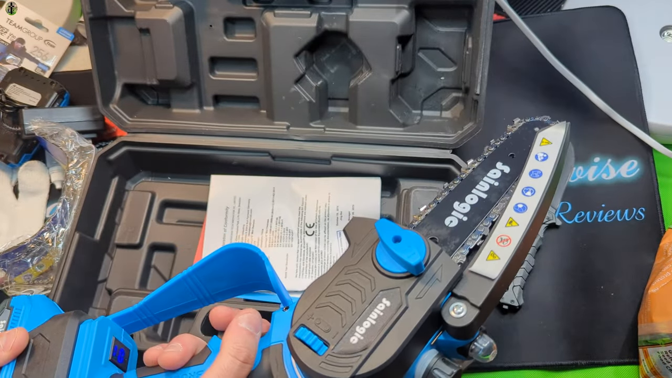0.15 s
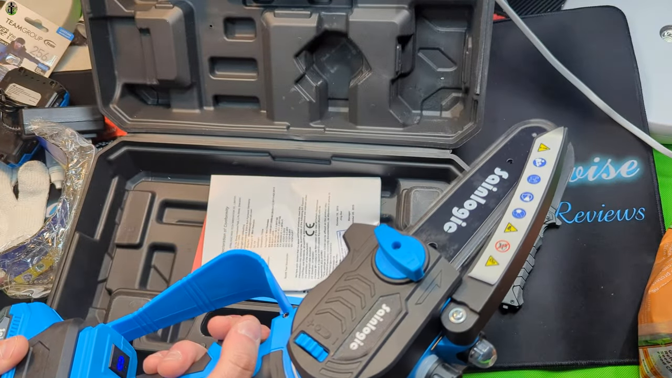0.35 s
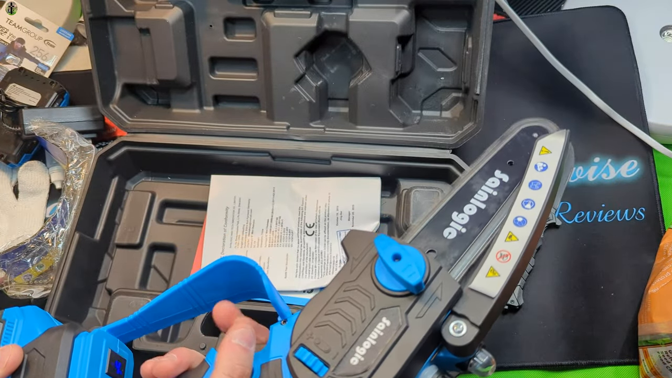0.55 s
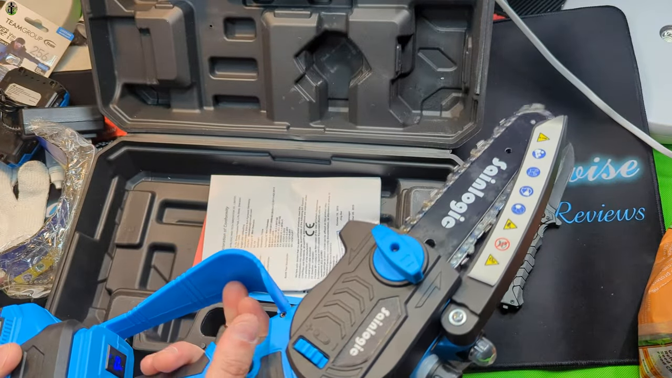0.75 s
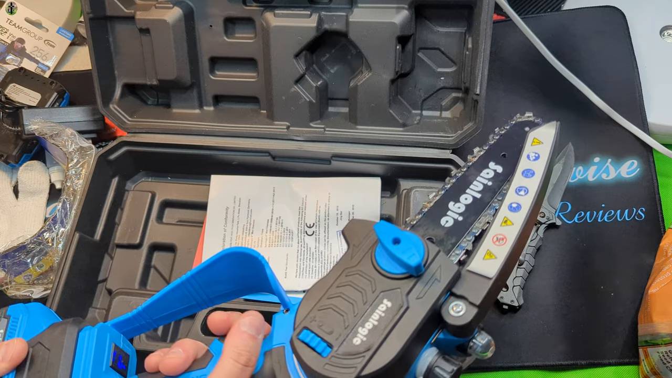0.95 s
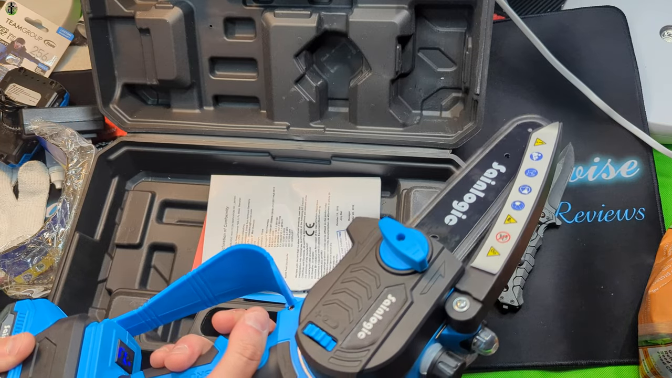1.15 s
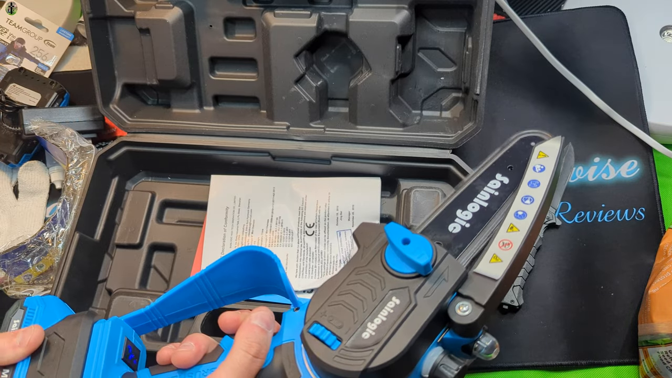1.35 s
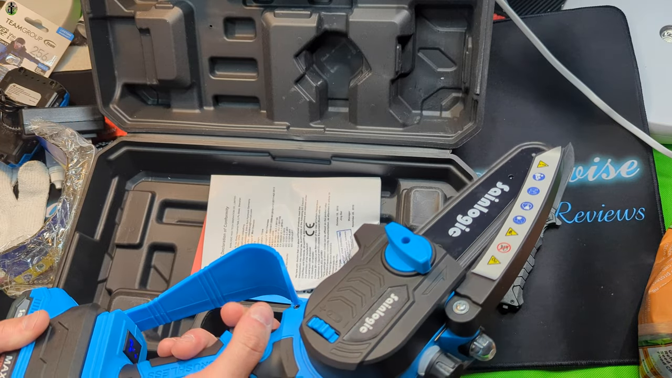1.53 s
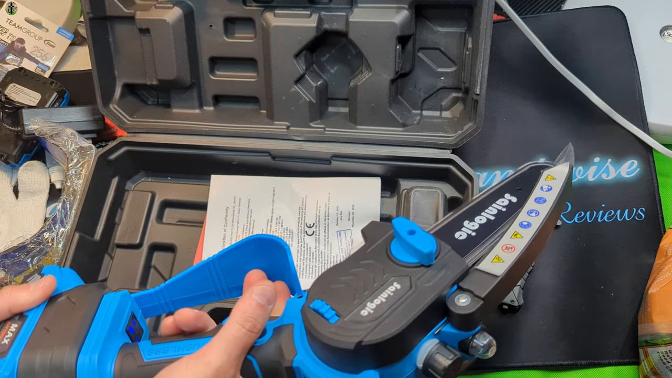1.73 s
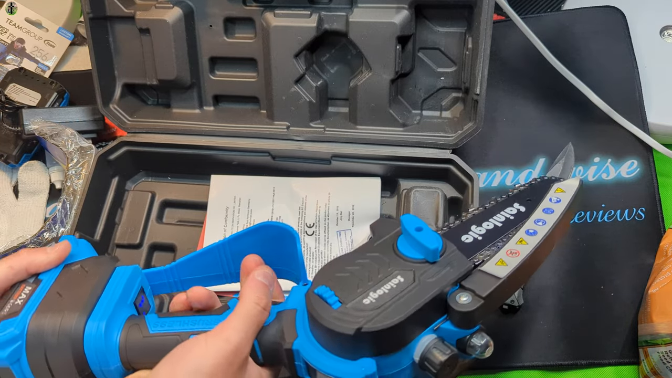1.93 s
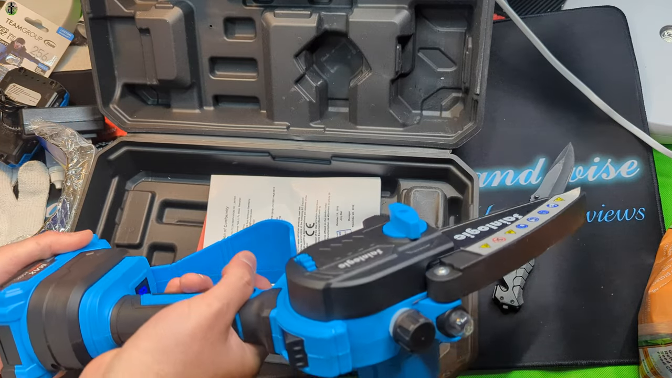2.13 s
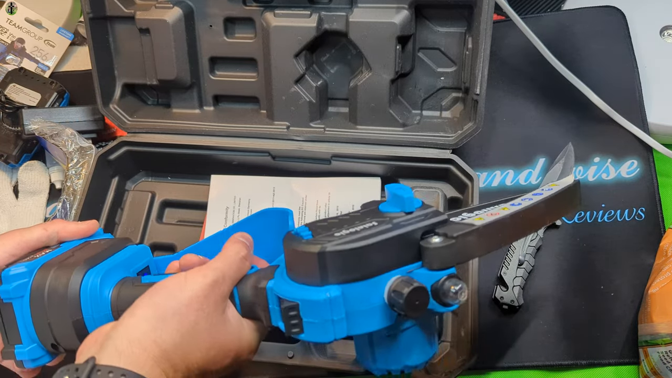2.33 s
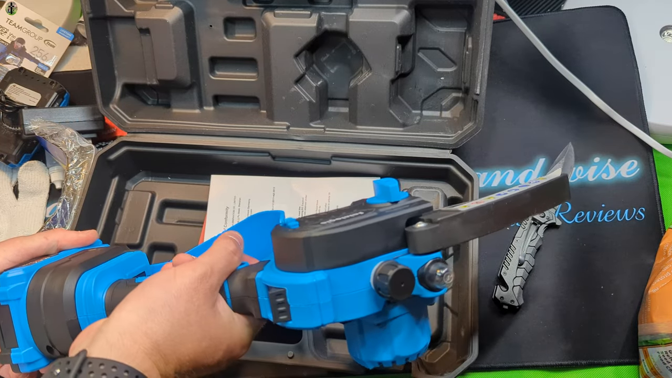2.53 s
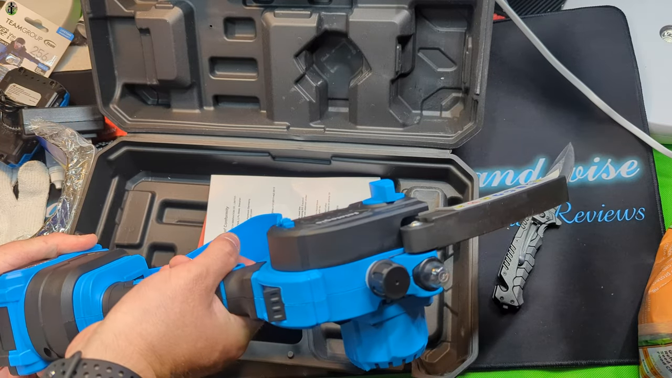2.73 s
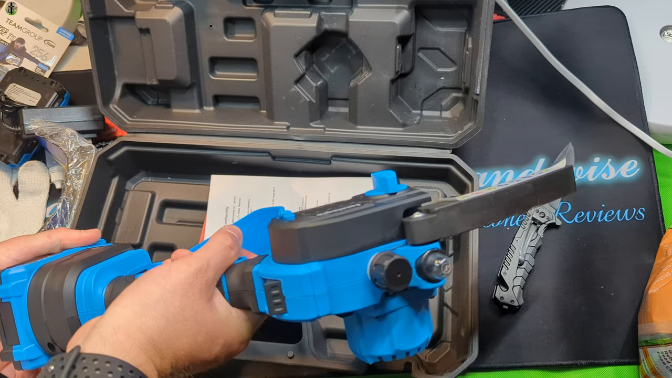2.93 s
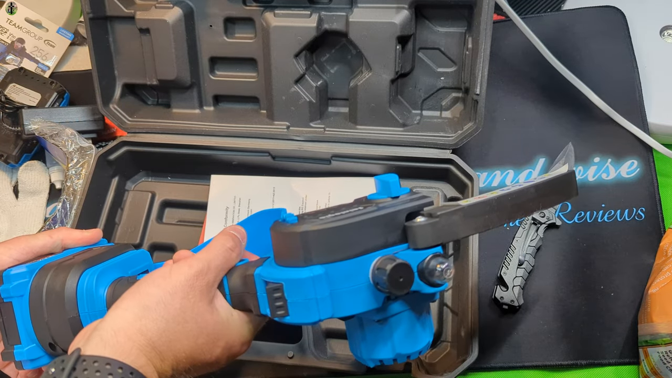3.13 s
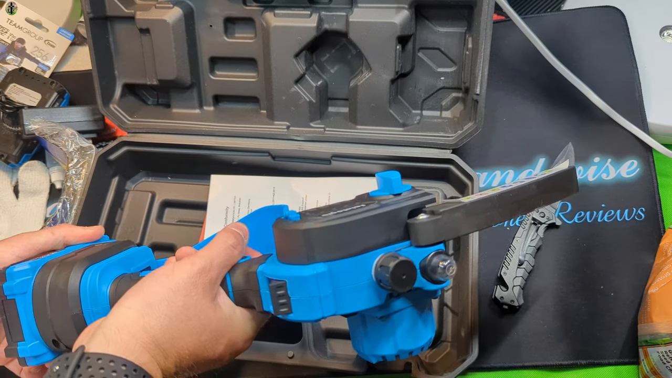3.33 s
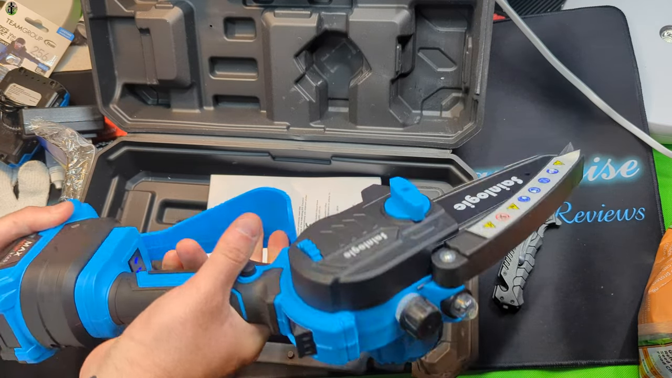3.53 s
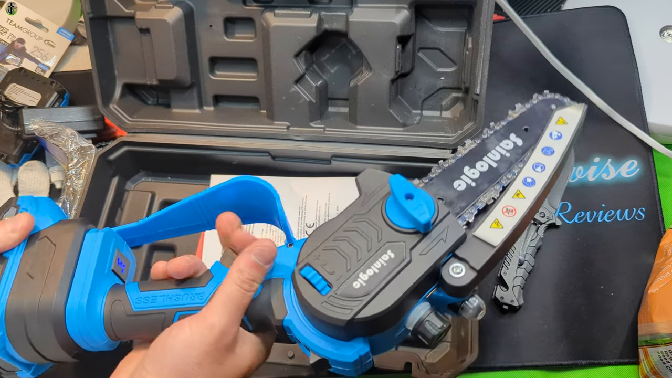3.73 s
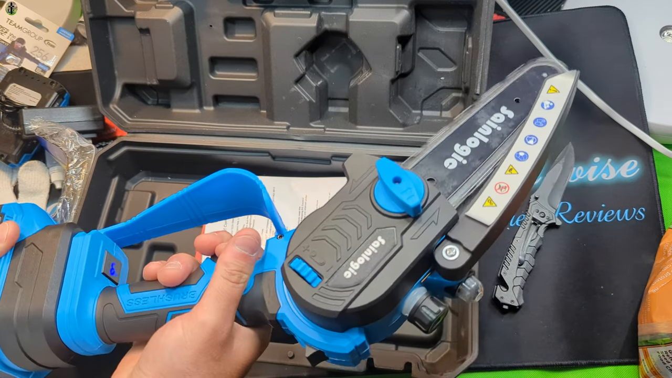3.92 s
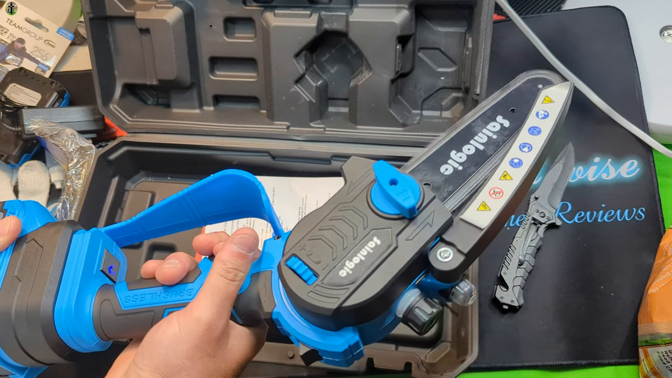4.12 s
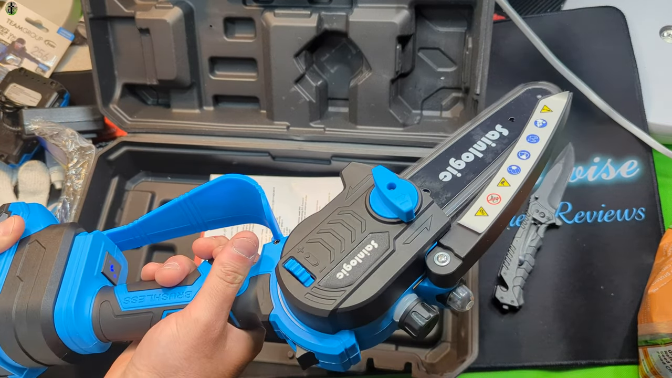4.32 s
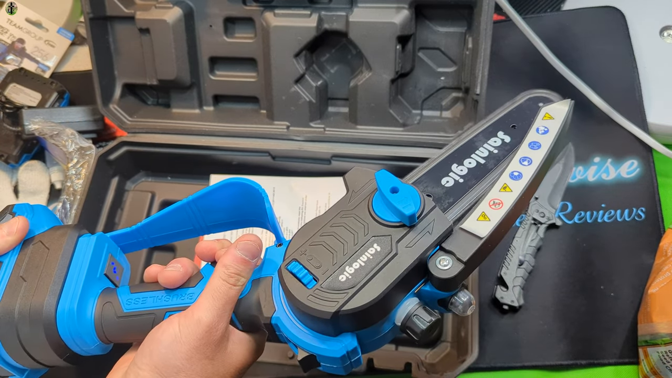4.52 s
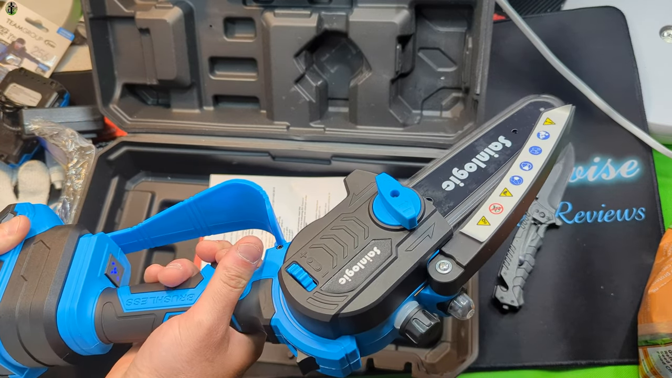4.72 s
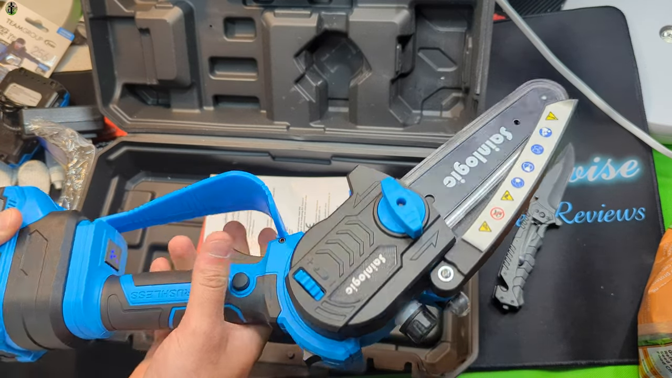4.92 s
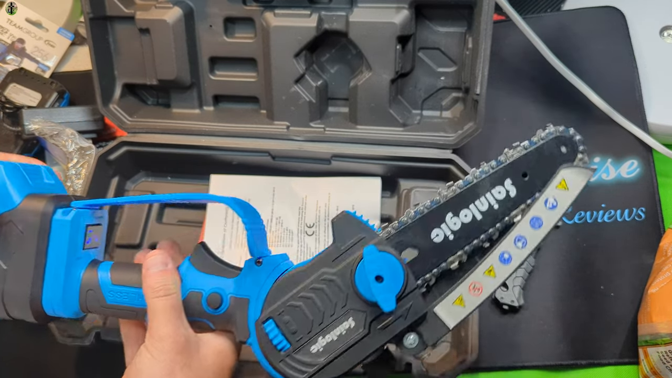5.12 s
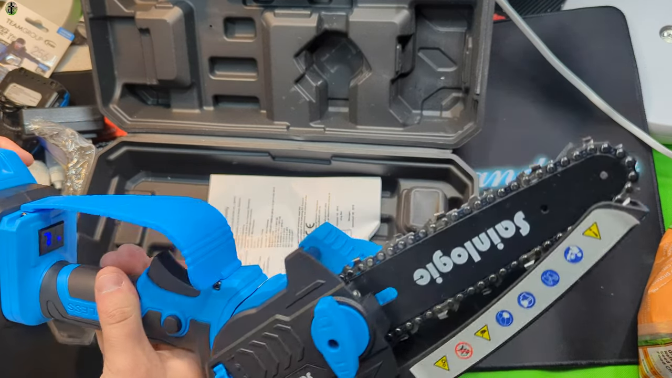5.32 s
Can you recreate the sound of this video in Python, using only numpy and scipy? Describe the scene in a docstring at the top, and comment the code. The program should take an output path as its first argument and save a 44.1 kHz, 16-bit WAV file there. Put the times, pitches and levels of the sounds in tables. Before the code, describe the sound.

Close to a stereo microphone in a small, fairly dry room, the last ring of a cordless mini chainsaw dies away, the trigger clicks, then four free-running bursts follow: two short, two longer. Each kicks in, whines upward into bright chain clatter and hiss, and brakes sharply. Plastic clicks fill the quiet gaps, and soft low air thumps bump the right side.

```python
"""A small cordless chainsaw runs free in four bursts, close to the microphone; an earlier burst is just dying away.
The trigger clicks, the motor kicks in, ramps up to full speed and brakes on release.
One drive speed times the link strikes (clatter and sizzle of filtered noise) and pitches the gear whine.
The saw rolls on its side in the third burst, which reshapes its resonances; narrow rough tones add start squeals,
ringing steel and a chain hum. Puffs of air thump the right port, over a short room tail, room noise and mains hum."""
import sys
import numpy as np
from scipy import signal
from scipy.fft import rfft, irfft
from scipy.io import wavfile
from scipy.ndimage import uniform_filter1d

SR = 44100
rng = np.random.default_rng(int(sys.argv[2]) if len(sys.argv) > 2 else 0)


def master_out(mix):
    """Clip the mix to full scale and print it as 16-bit PCM to the path in sys.argv[1]."""
    frames = np.transpose(np.atleast_2d(mix))
    ceiling = np.clip(frames, -1, 1)
    pcm = np.round(ceiling * 32767).astype(np.int16)
    wavfile.write(sys.argv[1], SR, pcm)


N = 240975
TIME = np.arange(N) / SR  # s

# squeezes of the trigger: (start [s], stop [s], kick [links/s], ramp [links/s per s], top speed [links/s],
# clatter trim [dB], sizzle trim [dB], time the gears settle [s], whistle trim of motor orders 12, 16, 24 [dB] each)
SQUEEZES = [(-.7, .001, 175, 460, 440, -3, -9, -.2, 0, 0, 0),
            (.222, .797, 171, 454, 443, -.2, -.5, .705, 4, -4, 1),
            (1.018, 1.83, 176, 458, 443, .2, 0, 1.745, 1, -8, 2),
            (2.128, 3.658, 183, 477, 442, -.9, -.3, 2.7, -1.5, 3.5, -7.5),
            (3.912, 5.05, 187, 430, 437, .7, .1, 4.48, -8.5, -6, -13)]
# how far the saw is rolled on its side: (time [s], share [0-1])
ROLL = [(1.9, 0), (2.55, 0.84), (3.45, 1), (3.75, 0.03)]
# the chain gets louder with speed: (speed [links/s], relative clatter [dB], relative sizzle [dB])
LOUDNESS = [(0, -37, -44), (100, -33, -39), (150, -28.5, -34), (205, -23.2, -27.8), (280, -20.6, -24),
            (440, -19.8, -21)]
# what rings on after the stop: (level [dB], fall [dB per s])
CLATTER_RING = (-18, 320)
SIZZLE_RING = (-13, 500)
# colour of links knocking in the housing: (frequency [Hz], relative level [dB])
CLATTER_COLOUR = [(100, -69.5), (250, -28), (400, -20), (650, -15), (1050, -17.3), (1350, -.7), (1800, 2.4),
                  (2200, -6), (2950, -16.5), (3600, -7), (4500, -12.5), (6200, -17.5), (16000, -37)]
# colour of steel sliding on the bar: (frequency [Hz], relative level [dB])
SIZZLE_COLOUR = [(500, -23), (2000, 2.5), (3800, 1.5), (5500, -0.5), (6300, -1.5), (7400, 1.5), (8600, 3.5),
                 (10600, 0), (12000, -6), (14000, -8.5), (15700, -11.5)]
# resonances of bar and housing: (frequency [Hz], width [Hz], lift held upright [dB], lift rolled on its side [dB])
BODY = [(330, 300, -3, 3), (953, 150, 5, 10.5), (1215, 77, 3.5, -12.5), (1349, 160, 3.5, 5),
        (1456, 57, 3.5, -10), (1626, 80, 1, 5), (1710, 43, 4, 1), (1860, 91, 0.5, 4), (2450, 320, -0.5, -1),
        (3100, 90, 1.5, -1.5), (3437, 200, 3.5, 3), (3940, 220, 2.5, 1.5), (4350, 79, 3, 3),
        (5700, 900, -0.5, 2), (7420, 300, 0, 3.5), (8500, 320, -1, 4.5), (10650, 230, 4, -5.5),
        (15500, 1200, 0.5, 2)]
# narrow rough tones: steel ringing near 3600 Hz, brief squeals near 2200 Hz as the motor starts,
# and near 885 Hz the chain's hum at twice the link rate:
# (start [s], end [s], frequency [Hz], half width [Hz], level [dB])
ROUGH_TONES = [(1.22, 1.83, 3530, 35, -27), (2.127, 2.23, 2200, 110, -34), (2.66, 3.57, 885, 25, -36),
               (3.92, 4.0, 2170, 60, -39), (4.1, 5.0, 3640, 35, -36)]
# steady tones of the drive: (cycles per link [count], relative level at full speed [dB],
# lift rolled on its side [dB], power of speed it grows with [exponent])
HUMS = [(1, -48.5, -3, 1.6), (2, -44, -2, .8)]
# steady tones of motor and gears: (cycles per motor turn [count], relative level at full speed [dB],
# lift rolled on its side [dB], power of speed it grows with [exponent])
GEARS = [(8, -28.5, 1.5, 3.5), (12, -40, 2, 1), (16, -44, 3, 1), (24, -45, 1, 1)]
# a gear tone whistles as it sweeps through a resonance:
# (motor order [cycles per turn], frequency [Hz], width [Hz], relative level [dB])
WHISTLES = [(12, 1200, 280, -27.5), (12, 2050, 340, -30.5), (12, 2680, 500, -22.7), (16, 2130, 360, -25),
            (24, 3380, 500, -24), (24, 3920, 300, -28), (24, 4500, 320, -28.5)]
# clicks of the trigger and its lock: (time [s], relative peak [dB], tilt towards the treble [dB per octave])
CLICKS = [(0.0804, -50, -5), (0.1115, -19, 0.5), (0.8749, -47, -5), (0.892, -40.5, -5), (0.9065, -26, -0.5),
          (0.9617, -47, 11), (2.0069, -28.5, -1.5), (2.0222, -24, -1), (3.7981, -37.5, -4),
          (3.8137, -25, -1)]
# colour of the plastic parts: (frequency [Hz], relative level [dB])
PLASTIC = [(100, -29), (350, -0.5), (800, -5.5), (1500, -4), (2400, 0), (4200, 0.5), (6500, -1),
           (9500, 3), (12000, -28.5), (16000, -27.5)]
# jolts of the chain as the drive starts or brakes: (time [s], relative peak [dB])
JOLTS = [(0.233, -11), (0.798, -29), (1.024, -10), (1.824, -15), (2.13, -22), (3.917, -12)]
# puffs of air on the right port: (time [s], peak pressure [dB], rise time [s], push or pull [+1 or -1])
PUFFS = [(1.675, -19, .012, 1), (1.751, -23, 0.015, -1), (4.422, -23, .007, -1), (4.525, -23, .012, -1),
         (4.706, -14.5, .014, -1), (4.934, -11, .02, 1)]
# likeness of the two microphone ports: (frequency [Hz], likeness [0-1])
PORT_LIKENESS = [(60, .55), (250, 0.93), (800, 0.98), (1600, 1), (3000, 0.73), (4300, 0.87), (5300, 0.72),
                 (7000, 0.3), (9200, 0.67), (10500, .38), (15000, .28)]
# balance of the ports: (frequency [Hz], left over right [dB])
PORT_BALANCE = [(300, -0.5), (900, -2), (1700, -2.3), (2600, -3), (4000, -3), (6000, -1.5), (7500, 2),
                (9500, 7.5), (11000, 3), (12500, -0.5), (15500, -6.5)]
# phase between the ports: (frequency [Hz], lead of the left [radians])
PORT_LEAD = [(100, 0.5), (500, -0.9), (1500, 0.4), (3000, -0.24), (5000, -.9), (7000, -1.94), (9400, -3),
             (10400, -4), (11400, -6), (14000, -7)]
# how long the room rings: (frequency [Hz], time to fall 60 dB [s])
ROOM_T60 = [(200, 0.5), (1500, 0.21), (5000, 0.16), (15000, 0.077)]
# quiet of the room: (frequency [Hz], relative density [dB per Hz])
AIR_COLOUR = [(12, -30), (20, -2), (61, -8.5), (80, -12), (147, -18.5), (223, -27), (294, -23.5),
              (357, -21), (1510, -47.5), (1830, -54.5), (15000, -60.5)]

AIR_DB, HUM_DB = -55.5, -58
MOTOR_PER_LINK = 13 / 24  # motor turns for each link
SPROCKET_TEETH, CHAIN_LINKS = 7, 37
KICK_S, BRAKE_S = .03, .11  # time constant of the first lurch; length of the braking
STALL_SPEED, FULL_SPEED = 185, 440  # links/s: where the chain stops dead; reference for the tones
KNEE_ORDER = 40  # how sharply the ramp levels off
DRIFT_SHARE, DRIFT_HZ = .003, 2.5  # the speed is never quite steady
START_S, STOP_S = .004, .006  # how quickly the chain noise sets in and drops
SURGE_DB, SIZZLE_SURGE_DB, SURGE_HZ = 1.1, .5, 14  # the slack chain runs in surges
CEILING, EDGE_HZ = .9, 15950  # peak limit and band limit of the recorder


def drive():
    """Speed in links/s: a kick, a steady ramp that levels off at the top, then braking down to the stall."""
    start, stop, kick, ramp, top = latest_squeeze()[:5]
    powered_s = np.clip(np.minimum(TIME, stop - BRAKE_S) - start, 0, None)
    speed = kick * (1 - np.exp(-powered_s / KICK_S)) + ramp * powered_s
    speed = speed / (1 + (speed / top) ** KNEE_ORDER) ** (1 / KNEE_ORDER)
    speed = speed * (1 + DRIFT_SHARE * wander(DRIFT_HZ))
    braked = np.clip(1 + (TIME - stop) / BRAKE_S, 0, 1)
    return speed + (STALL_SPEED - speed) * braked, TIME < stop


def latest_squeeze():
    """The settings of the latest squeeze at every moment, one row per column of the table."""
    table = np.array(SQUEEZES)
    return table[np.searchsorted(table[:, 0], TIME, "right") - 1].T


def rolled():
    """Share by which the saw lies on its side."""
    return np.interp(TIME, *np.transpose(ROLL))


def chain(links, speed):
    """Links knock on the sprocket and bar; cutters tick and scrape along the groove."""
    clatter_gain, sizzle_gain = chain_levels(speed)
    hz = bins(TIME)
    # a slow chain only slides, a fast one is flung about
    flung = np.clip((np.gradient(links) * SR - 70) / 230, 0, 1)
    sliding = np.sqrt(1 - flung ** 2)

    knocks = strikes(links, scatter_db=1.2, slap_db=3.2, uneven_db=1.5, wobble_db=4.8,
                     jitter_s=.0001, decay_s=.0015, count=80)
    rub = (amp(-10) + .8 * sliding) * rng.standard_normal((2, N))
    clatter = housing(coloured(flung * knocks + rub, read(CLATTER_COLOUR, hz)))

    # two ticks per link
    ticks = strikes(2 * links, scatter_db=2.0, slap_db=0.5, uneven_db=-0.5, wobble_db=-0.2,
                    jitter_s=.0004, decay_s=.0011, count=60)
    scrape = (amp(0.5) + 0.32 * sliding) * rng.standard_normal((2, N)) * amp(1.4 * wander(50))
    sizzle = housing(coloured(flung * ticks + scrape, read(SIZZLE_COLOUR, hz)))

    clatter *= amp(-1.37) * clatter_gain / band_rms(clatter, 1000, 2500)
    sizzle *= amp(-1.0) * sizzle_gain / band_rms(sizzle, 5000, 15000)
    return clatter + sizzle


def chain_levels(speed):
    """Gains of clatter and sizzle: they follow the speed and ring out once the chain has stopped."""
    start, stop, _, _, _, clatter_db, sizzle_db, *_ = latest_squeeze()
    speeds, clatter_law_db, sizzle_law_db = np.transpose(LOUDNESS)
    begun = np.clip((TIME - start) / START_S, 0, 1)
    stopped_s = np.maximum(TIME - stop, 0)

    def fade(ring_db, fall):
        """A quick drop that gives way to a slower ring."""
        return begun * np.maximum(np.exp(-stopped_s / STOP_S), amp(ring_db - fall * stopped_s))

    surge = wander(SURGE_HZ)
    clatter_db = np.interp(speed, speeds, clatter_law_db) + clatter_db + SURGE_DB * surge
    sizzle_db = np.interp(speed, speeds, sizzle_law_db) + sizzle_db + SIZZLE_SURGE_DB * surge
    return fade(*CLATTER_RING) * amp(clatter_db), fade(*SIZZLE_RING) * amp(sizzle_db)


def strikes(passes, scatter_db, slap_db, uneven_db, wobble_db, jitter_s, decay_s, count):
    """Each whole pass strikes one of many spots; force varies by chance, slack slap and repeating patterns."""
    at = np.flatnonzero(np.diff(np.floor(passes)))
    number = np.arange(len(at))
    own = rng.standard_normal(CHAIN_LINKS)[number % CHAIN_LINKS]
    chance, late, slap = rng.standard_normal((len(at), 3)).T
    slap = evened(uniform_filter1d(slap, 2))  # neighbours hit together
    swing = np.sin(2 * np.pi * number / SPROCKET_TEETH)
    force_db = scatter_db * chance + slap_db * slap + uneven_db * own + wobble_db * swing
    force = np.tanh(amp(force_db - 6))  # the groove limits how far a link can fly

    spots = [ring(decay_s) for _ in range(count)]
    out = np.zeros((2, N))
    for s, size, spot in zip(at / SR + jitter_s * late, force, rng.integers(0, count, len(at))):
        add(out, s, size * spots[spot])
    # level out the slow loudness; the chain gains set it afterwards
    power = uniform_filter1d((out ** 2).mean(0), SR // 16)
    return out / np.sqrt(abs(power) + 1e-3 * power.mean())


def housing(two):
    """Resonances of bar and housing; which ones face the microphone depends on the roll."""
    hz, roll = bins(two), rolled()
    bumps = np.array([np.exp(-2.8 * ((hz - f) / width) ** 2) for f, width, _, _ in BODY])
    upright_db, rolled_db = np.array(BODY)[:, 2:].T @ bumps
    return ports((1 - roll) * coloured(two, upright_db) + roll * coloured(two, rolled_db))


def whine(links, speed):
    """The sprocket hums at the link rate; motor and gear teeth whine, but only while fast and under power."""
    _, stop, *_, settle, db_12, db_16, db_24 = latest_squeeze()
    whistle_db, roll = {12: db_12, 16: db_16, 24: db_24}, rolled()
    # the gears whistle until they settle, in the second of the four bursts right through full speed
    unsettled = np.clip(.5 + (settle - TIME) / .04, 0, 1)
    powered = uniform_filter1d(1. * (TIME < stop - BRAKE_S + .01), SR // 25)
    driven = np.clip((speed - 120) / 105, 0, 1) ** 2 * powered
    share = speed / FULL_SPEED

    # imbalance of the rotor grows with speed
    out = amp(-60.5) * share ** 2 * np.exp(2j * np.pi * MOTOR_PER_LINK * links)
    for per_link, tones in ((1, HUMS), (MOTOR_PER_LINK, GEARS)):
        for multiple, db, rolled_db, power in tones:
            order = multiple * per_link  # cycles per link
            gain = amp(db + rolled_db * roll) * share ** power
            for motor_order, hz, width_hz, peak_db in WHISTLES:
                if motor_order == multiple:
                    resonance = np.exp(-2.8 * ((order * speed - hz) / width_hz) ** 2)
                    gain = gain + unsettled * amp(peak_db + whistle_db[multiple]) * resonance
            # the chain tugs at the drive, so the teeth mesh unevenly and lose contact now and then
            tug = .09 * wander(40) + .05 * wander(200)
            turns = order * links + min(order, 8) / 8 * tug + .02 * wander(30)
            sprocket_swing = np.sin(2 * np.pi * links / SPROCKET_TEETH)
            contact_db = np.minimum(4.5 * wander(22) + 2 * wander(150) + 2.5 * sprocket_swing, 4)
            out += gain * amp(contact_db) * np.exp(2j * np.pi * turns)
    return amp(3.45) * driven * ports(np.array([out.real, out.imag]))


def rough_tones():
    """Start squeals, ringing steel and a chain hum: each a fixed pitch blurred by random swings of its two phases."""
    out = np.zeros(N)
    for start, end, hz, width_hz, db in ROUGH_TONES:
        phase = 2 * np.pi * hz * TIME
        tone = wander(width_hz) * np.cos(phase) + wander(width_hz) * np.sin(phase)
        fade = np.clip(np.minimum((TIME - start) / 0.0092, (end - TIME) / .03), 0, 1)
        out += amp(db) * tone * fade
    return out * amp([[-1.3], [1.3]])  # leans to the right


def trigger_and_jolts():
    """Plastic parts snap in the grip; the slack chain jerks against the bar."""
    out = np.zeros((2, N))
    for s, db, tilt_db in CLICKS:
        add(out, s, amp(db + 1.5) * blow(PLASTIC, decay_s=0.0067, tilt_db=tilt_db))
    for s, db in JOLTS:
        add(out, s - .001, amp(db - 4) * blow(CLATTER_COLOUR, decay_s=.0045))
    return out


def blow(spectrum, decay_s, tilt_db=0):
    """One short hit of peak 1, brighter or duller by tilt_db an octave."""
    hit = np.pad(ring(decay_s), ((0, 0), (32, 0)))
    hz = bins(hit)
    hit = ports(coloured(hit, read(spectrum, hz) + tilt_db * np.log2((hz + 100) / 3000)))
    hit = hit * np.clip(np.linspace(4, 0, hit.shape[-1]), 0, 1) ** 2  # fade the last quarter
    return hit / abs(hit.mean(0)).max()


def puffs():
    """Air pushes on one port; the pressure leaks away and swings back."""
    out, t = np.zeros((2, N)), np.arange(SR // 2) / SR
    for s, db, rise, sign in PUFFS:
        push = t * np.exp(-t / rise)
        push = signal.lfilter(*signal.butter(1, 4.5, "high", fs=SR), push)
        push = signal.lfilter(*signal.butter(1, 3.5, "high", fs=SR), push)
        push = signal.lfilter(*signal.butter(1, 200, "low", fs=SR), push)  # a soft front
        add(out[1], s, sign * amp(db) * push / push.max())
    return out


def room(x):
    """A short tail of decaying noise, each band dying at its own speed."""
    taps = rng.standard_normal((2, SR // 2)) * (np.arange(SR // 2) > .004 * SR)
    hz, t, z = signal.stft(taps, SR, nperseg=256)
    tail = signal.istft(z * amp(-60 * t / read(ROOM_T60, hz)[:, None]), SR, nperseg=256)[1]
    return signal.fftconvolve(x, tail / np.linalg.norm(tail[0]), axes=1)[:, :N]


def background():
    """Low room noise, partly shared by both ports, and a faint mains hum."""
    noise = rng.standard_normal((2, N)) * 0.77 + rng.standard_normal(N)
    air = coloured(noise, read(AIR_COLOUR, bins(TIME)))
    return amp(AIR_DB) * evened(air) + amp(HUM_DB) * np.sin(2 * np.pi * 60 * TIME)


def ports(two):
    """Turns two unrelated versions of a sound into what the left and right ports pick up."""
    hz, (a, b) = bins(two), rfft(two)
    same, lean = read(PORT_LIKENESS, hz), amp(read(PORT_BALANCE, hz) / 2)
    right = (same * a + np.sqrt(1 - same ** 2) * b) * np.exp(-1j * read(PORT_LEAD, hz))
    return irfft(np.array([a * lean, right / lean]), two.shape[-1])


def ring(decay_s, size=2048):
    """Two versions of a short ring: decaying noise stands in for many crowded modes."""
    return evened(rng.standard_normal((2, size)) * np.exp(-np.arange(size) / SR / decay_s))


def wander(rate):
    """Random drift of rms 1, mostly slower than rate in Hz."""
    hz = bins(TIME)
    hz = hz[hz < 6 * rate]
    real, imag = rng.standard_normal((2, len(hz)))
    return evened(irfft((real + 1j * imag) / (1 + (hz / rate) ** 4), N))


def amp(db):
    """Decibels to gain."""
    return 10 ** (np.asarray(db) / 20)


def evened(x):
    """Scales to rms 1."""
    return x / np.sqrt(np.mean(x ** 2) + 1e-20)


def read(points, hz):
    """Reads a spectrum on a log-frequency axis."""
    f, value = np.transpose(points)
    return np.interp(np.log(hz + 1), np.log(f + 1), value)


def bins(x):
    """Frequencies of the spectrum of x."""
    return np.fft.rfftfreq(x.shape[-1], 1 / SR)


def coloured(x, db):
    """Filters x by a gain in dB for each frequency."""
    return irfft(rfft(x) * amp(db), x.shape[-1])


def band_rms(pair, lo_hz, hi_hz):
    """Strength of the middle of a stereo pair within a band."""
    hz = bins(pair)
    band = rfft(pair.mean(0))[(hz > lo_hz) & (hz < hi_hz)]
    return np.sqrt(2 * np.sum(abs(band) ** 2)) / pair.shape[-1]


def add(mix, s, sound):
    """Mixes a sound in at a time in seconds."""
    part = mix[..., max(round(s * SR), 0):][..., :sound.shape[-1]]
    part += sound[..., :part.shape[-1]]


def scene():
    """The drive speed turns chain and motor together; room, puffs and background join the saw."""
    speed, moving = drive()
    links = np.cumsum(speed * moving) / SR  # links passed so far
    saw = chain(links, speed) + whine(links, speed) + rough_tones() + trigger_and_jolts()
    return saw + amp(-22) * room(saw) + puffs() + background()


def record(dry):
    """The recorder rounds off the highest peaks; then its band limit."""
    rounded = dry / (1 + (dry / CEILING) ** 8) ** (1 / 8)
    band_limit = signal.firwin(511, EDGE_HZ, window=("kaiser", 9), fs=SR)
    return signal.oaconvolve(rounded, band_limit[None], "same")


dry = scene()
out = record(dry)
master_out(out)
```